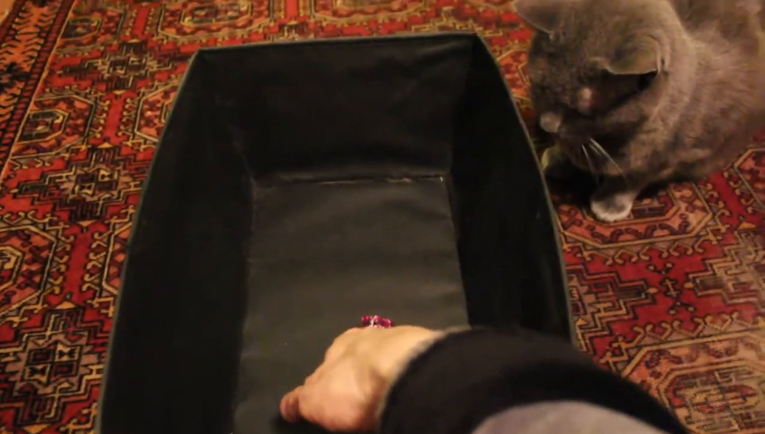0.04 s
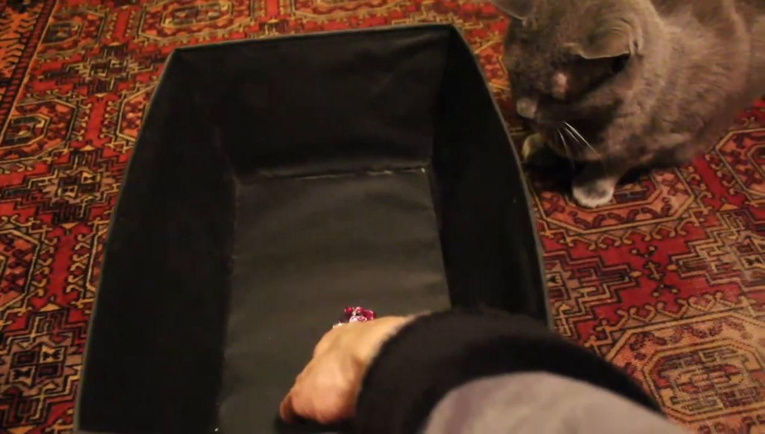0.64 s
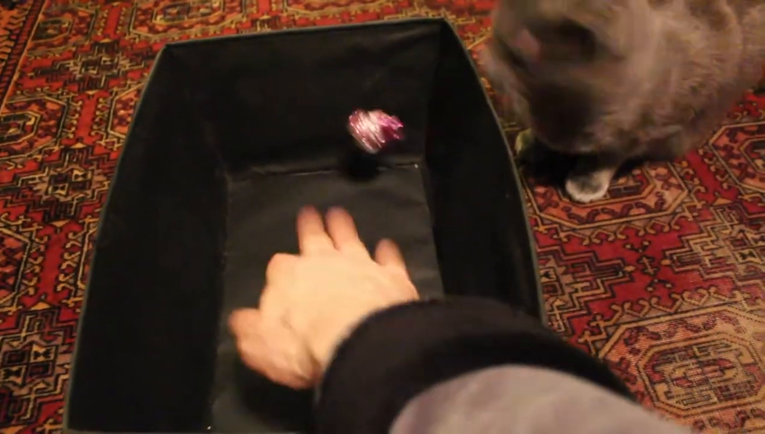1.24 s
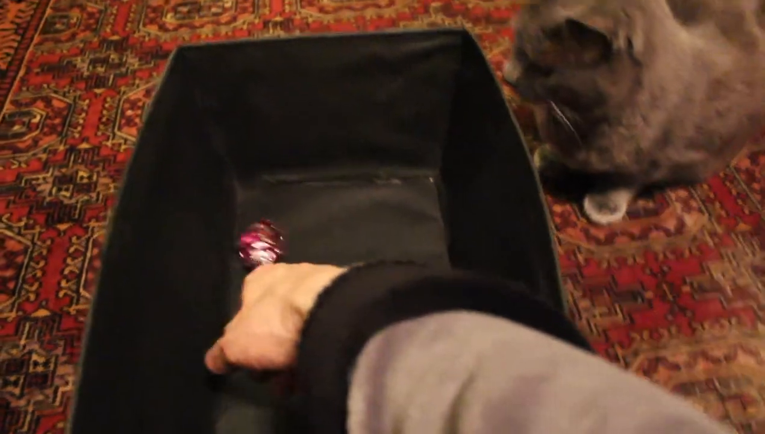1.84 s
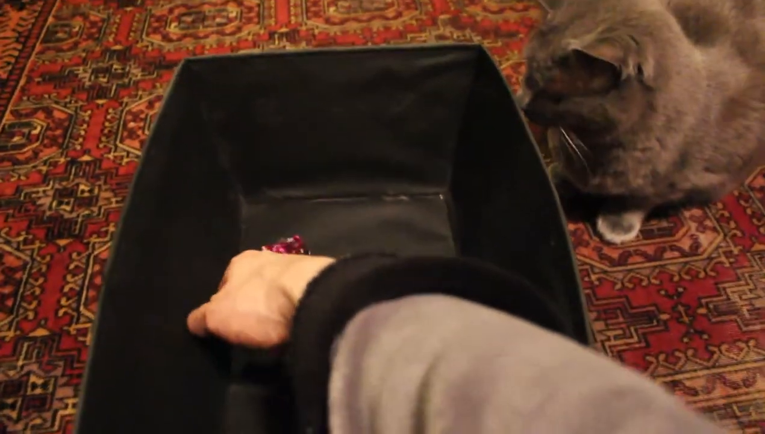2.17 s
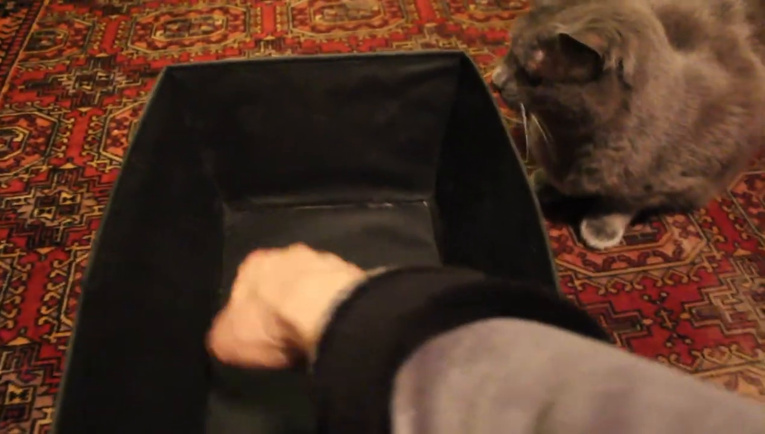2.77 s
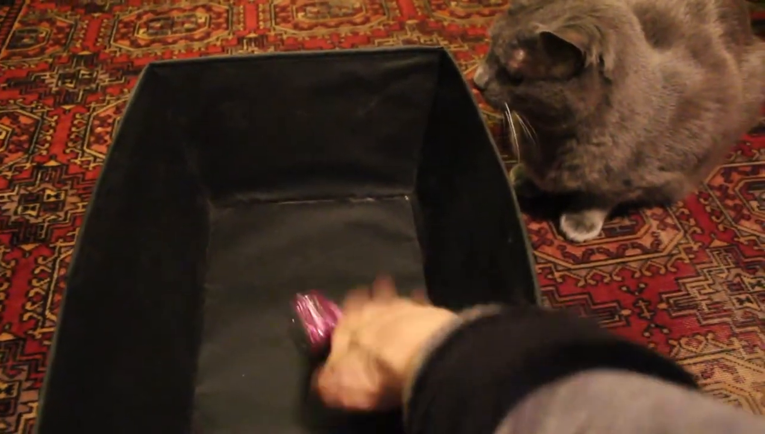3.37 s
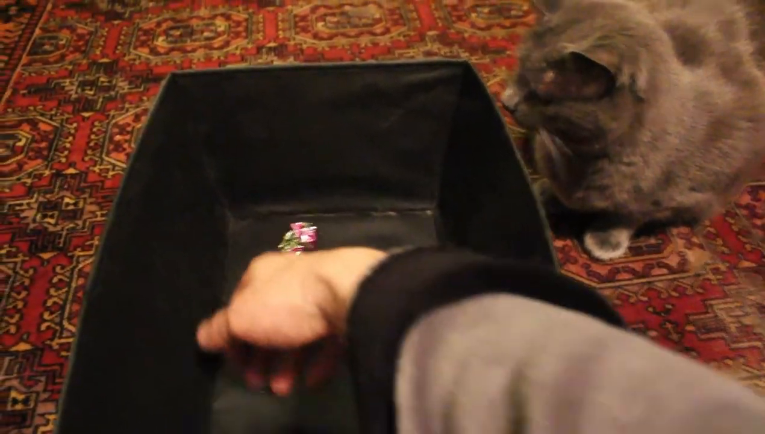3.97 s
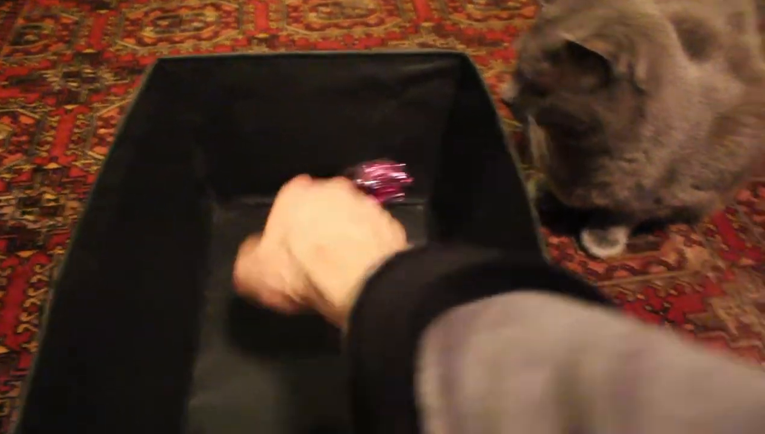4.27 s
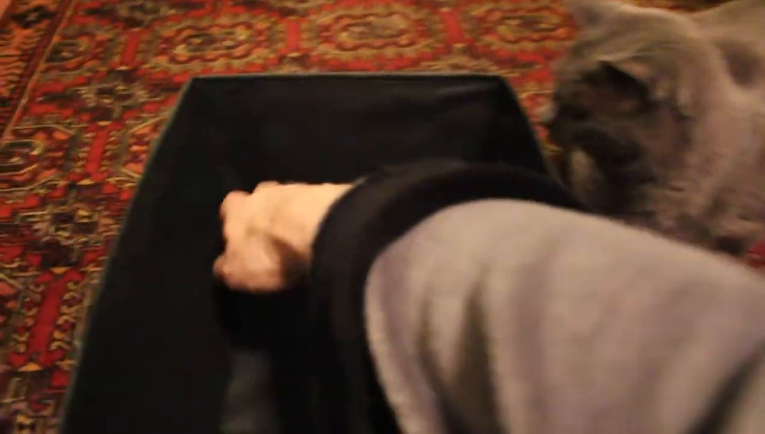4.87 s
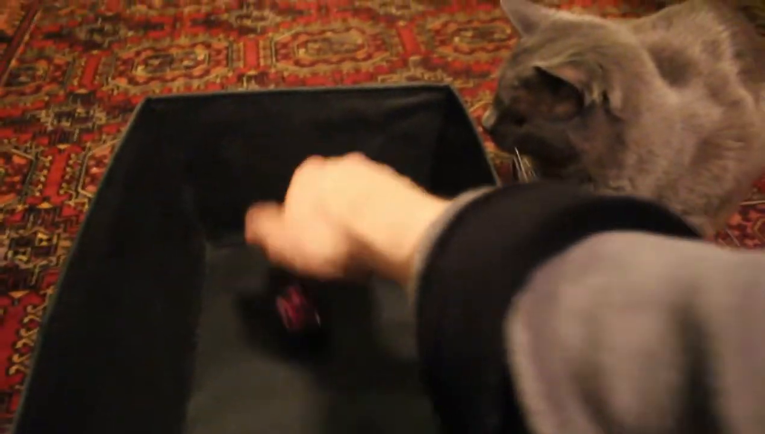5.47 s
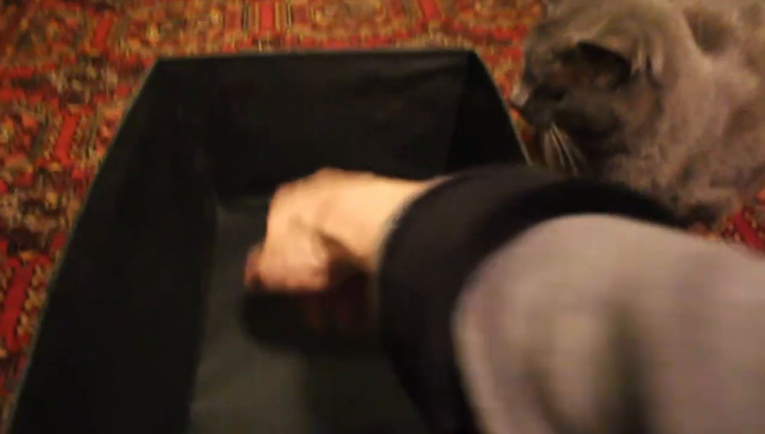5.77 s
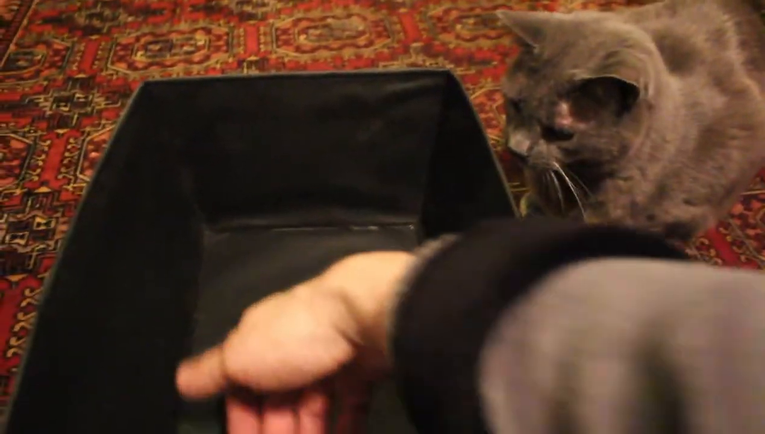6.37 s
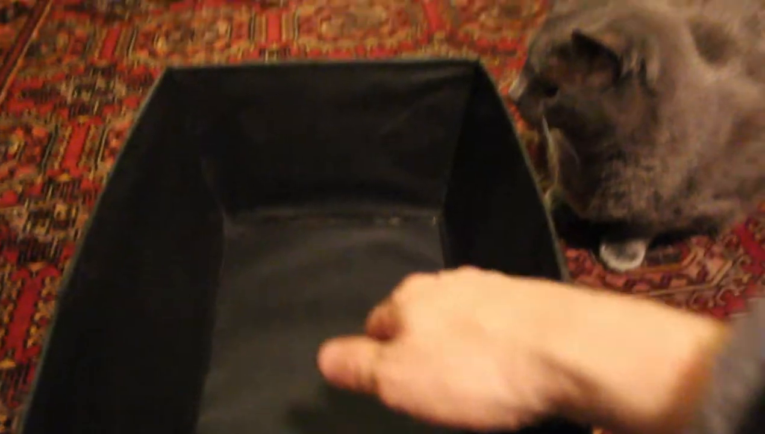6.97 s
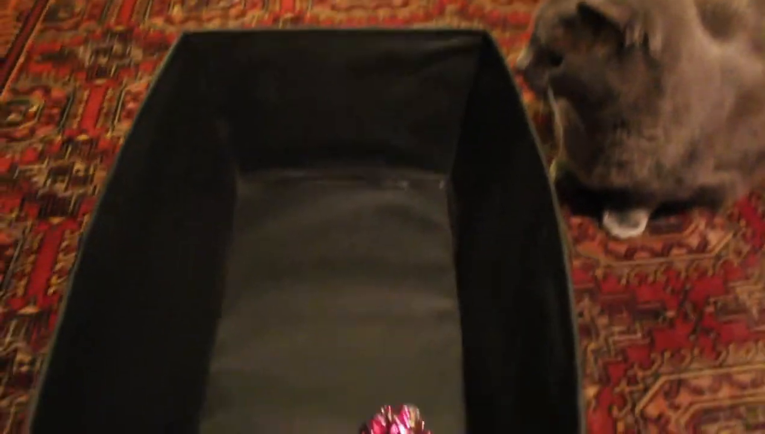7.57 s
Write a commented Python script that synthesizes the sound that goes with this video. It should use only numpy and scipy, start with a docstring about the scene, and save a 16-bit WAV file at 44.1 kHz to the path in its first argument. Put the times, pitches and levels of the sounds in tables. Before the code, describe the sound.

A low hum and soft noise fill a small room, with two faint handling rubs by the microphone. At about 1.1 seconds a crumpled foil ball is flicked inside a fabric box: a quick cluster of crisp crackling taps and light thumps, then bounces and small tumbling ticks. Around 2.5 seconds comes a sharp crunch with a stronger, dull wall thump. Softer crackles and a cloth scuff follow from 3.4 seconds. At 4.2 seconds a tight burst of clicks lands with a deep thump, and another sharp hit comes at 5.1. Lighter taps fall around 5.8, then a loud snap and thump at 6.5. Between hits the ball rolls with faint crinkling, and fingers occasionally tick or rub close to the microphone. Two soft taps come just before 7 seconds, and a sleeve rustles faintly at the end. Everything sounds close, with a short echo.

```python
"""In a small living room, a crumpled foil ball is flicked round a soft fabric box on the carpet.
It crackles, thumps the walls, bounces and rolls out. Each contact is a burst of tiny snaps of its
creases. The box's panels swing, the floor booms, and the ceiling and the room answer.
A hand ticks and rubs on the case of the camera it holds, over a low hum and room noise.
A sleeve rustles faintly at the end."""
import sys
import numpy as np
from scipy import signal
from scipy.fft import rfft, irfft, next_fast_len
from scipy.io import wavfile
from scipy.ndimage import uniform_filter1d, map_coordinates

SR = 44100
rng = np.random.default_rng(int(sys.argv[2]) if len(sys.argv) > 2 else 0)


def generate_wav(signal):
    """Clip the signal to [-1, 1] and save it as 16-bit WAV at the path in sys.argv[1]."""
    frames = np.transpose(np.atleast_2d(signal))
    scaled = np.clip(frames, -1, 1) * 32767
    pcm = np.round(scaled).astype(np.int16)
    wavfile.write(sys.argv[1], SR, pcm)


N = 340839

# The tone of the room noise. Each row: frequency in Hz, relative level in dB.
AIR_TONE = [(25, -16.5), (45, -23), (70, -1), (95, -19), (170, -10.5), (250, -9), (400, -6.5), (700, -13),
            (1000, -15.5), (1600, -17), (3000, -14.5), (4200, -22.5), (9000, -31), (16000, -42.5)]
# Narrow humps in the background noise. Each row: pitch in Hz, width in Hz, relative level in dB.
DRONE_MODES = [(119.3, 31, -12), (1164, 61, -5.5)]
# Fingers slip on the camera case. Each row: start in seconds, level in dB, length in seconds.
CASE_RUBS = [(.235, -48, .075), (.604, -46, 0.027), (6.655, -42, 0.044), (6.69, -37.5, 0.1)]
# The grip ticks on the case. Each row: start in seconds, relative level in dB.
CASE_TICKS = [(3.262, -33.5), (4.401, -23.5), (5.201, -22.5), (5.727, -18.5), (7.168, -29)]
# How the case rings. Each row: pitch in Hz, width in Hz, relative level in dB.
CASE_MODES = [(974, 47, -6), (1187, 106, 6.5), (2060, 150, -1.5), (3730, 130, -5.5)]
# The room's echo. Each row: frequency in Hz, seconds it takes to fade by 60 dB.
ROOM_DECAY = [(150, 0.23), (1000, 0.25), (3000, 0.28), (7000, 0.26), (15000, 0.12)]
# The ball meets finger, wall or floor.
# Each row: start in seconds, level in dB, length in seconds, brightness in dB per octave.
BALL_CONTACTS = [(1.125, -26.5, 0.011, 0), (1.169, -31, 0.0043, 1.5), (1.185, -30, 0.014, 1),
                 (1.2296, -19.5, 0.0058, 1), (1.447, -24, 0.005, 0.5), (1.589, -34, 0.0042, 1),
                 (2.524, -22, 0.016, 1.8), (2.567, -26.5, .011, .3), (2.78, -29, 0.01, .5),
                 (3.384, -31, 0.042, -.2), (3.437, -39.5, 0.05, 1.5), (3.533, -37.5, 0.013, 2.5),
                 (3.578, -33.5, 0.025, 1.2), (3.701, -29.5, 0.014, 3), (4.173, -23.5, 0.0052, 2.5),
                 (4.192, -22, 0.0085, 2.5), (4.21, -29, .014, -2), (4.238, -28, 0.028, 1.5),
                 (4.38, -34, 0.018, 0.5), (5.06, -32, .021, 0), (5.08, -19.5, 0.0068, 2.8),
                 (5.116, -36.5, 0.027, 1), (5.224, -39, 0.04, -0.1), (5.762, -28, 0.019, 0.7),
                 (5.803, -35, 0.027, 2), (5.845, -33.5, 0.0081, 2), (6.023, -31.5, 0.017, -0.5),
                 (6.48, -16.5, 0.0039, 0.9), (6.506, -28, .015, .4), (6.525, -20, 0.0054, 0),
                 (6.767, -33.5, 0.025, -1.2), (6.931, -36, 0.014, -1)]
# The tone of the foil's snaps. Each row: frequency in Hz, relative level in dB.
FOIL_TONE = [(100, -30), (300, -10.5), (570, -19), (850, -6), (1300, -8.5), (1900, -1.5), (2500, -3.5),
             (3400, -0.5), (4800, -3.5), (6800, -7), (9500, -11), (12600, -19.5), (16000, -29)]
# Blows that move the box's panels. Each row: start in seconds, swing in dB, pitch in Hz.
PANEL_THUMPS = [(1.172, -34, 330), (1.232, -30.5, 330), (1.893, -35.5, 262), (2.188, -35.5, 255),
                (2.573, -19, 225), (2.782, -38, 200), (3.382, -27, 274), (4.194, -16, 151),
                (4.209, -37, 220), (4.259, -34, 130), (5.068, -30.5, 162), (5.858, -32.5, 217),
                (6.529, -19, 280)]
# Scuffs on the fabric. Each row: start in seconds, level in dB, length in seconds.
FABRIC_SCUFFS = [(1.449, -38, .004), (1.589, -35, 0.005), (2.494, -48, 0.017), (3.379, -30.5, 0.035),
                 (4.135, -43.5, 0.038), (4.194, -26, 0.0067), (5.068, -46, 0.0087), (5.758, -40.5, 0.011),
                 (5.848, -37, 0.013), (6.527, -30.5, .007)]
# How the taut fabric rings. Each row: pitch in Hz, width in Hz, relative level in dB.
FABRIC_MODES = [(850, 360, 5.5), (1385, 380, -2), (2040, 320, -2)]
# Faint rustles: the ball rolls out or shifts in the hand, and a sleeve rustles at the end.
# Each row: start in seconds, level in dB, length in seconds.
FAINT_RUSTLES = [(1.65, -52, 0.22), (1.956, -51.5, 0.31), (2.938, -49.5, 0.36), (3.72, -52.5, 0.43),
                 (4.47, -49.5, .55), (5.36, -51, .43), (6.066, -52.5, 0.66), (6.96, -51, 0.25),
                 (7.613, -57, .76)]
# The ball tips from edge to edge.
# Each row: start in seconds, first level in dB, seconds between tumbles, number of tumbles.
BALL_TUMBLES = [(1.664, -42, .047, 3), (2.859, -38.5, 0.093, 2), (3.781, -39.5, .044, 3),
                (4.541, -38, .087, 3), (5.363, -41, .052, 4), (6.09, -41.5, 0.085, 4)]
# The microphones' balance. Each row: frequency in Hz, how much louder the left one is in dB.
LEFT_LEAN = [(100, 6.4), (1000, 5.3), (4000, 4.9), (9000, 2.5)]


def amp(db):
    """Turn decibels into a gain."""
    return 10 ** (np.asarray(db) / 20)


def unit(x):
    """Scale a sound to an average (rms) level of 1."""
    return x / np.sqrt(np.mean(x ** 2) + 1e-20)


def along(points, hz):
    """Read between (Hz, value) points on a log frequency axis."""
    f, v = np.transpose(points)
    return np.interp(np.log(hz + 1), np.log(f + 1), v)


def add(track, s, x):
    """Mix x into the track, starting at s seconds."""
    i = max(round(s * SR), 0)
    track[..., i:i + x.shape[-1]] += x[..., :N - i]


def filtered(x, response):
    """Give each frequency in x the gain that response sets for it."""
    size = next_fast_len(N + SR // 2)
    return irfft(rfft(x, size) * response(np.fft.rfftfreq(size, 1 / SR)), size)[..., :N]


def resonances(modes, f):
    """A filter that rings at each mode, a pitch the object favours."""
    return sum(amp(db) * 1j * f * width / (pitch ** 2 - f * f + 1j * f * width)
               for pitch, width, db in modes)


def causal(db, size):
    """A filter with these gains that never rings before it is struck (minimum phase)."""
    cepstrum = irfft(np.log(amp(db)), size)
    cepstrum[1:size // 2] *= 2
    cepstrum[size // 2 + 1:] = 0
    return np.exp(rfft(cepstrum))


def stereo_noise(apart=1.0):
    """Hiss that both sides share, plus some of each side's own."""
    return rng.standard_normal(N) + apart * rng.standard_normal((2, N))


def snaps(count, rate, spread_db):
    """Random clicks of uneven size, about rate a second and at least one."""
    chance, sign, strength = rng.random(count), rng.choice([-1, 1], count), rng.standard_normal(count)
    fires = chance <= max(rate / SR, chance.min())
    return fires * sign * amp(spread_db * np.clip(strength, -2, 2))


def stereo_snaps(count, rate, spread_db, apart=1.0):
    """Some snaps reach both microphones, others just one."""
    shared, left, right = (snaps(count, rate, spread_db) for _ in range(3))
    return shared + apart * np.array([left, right])


def body(modes, top_hz, size=4096):
    """How a small body rings, with little bass; a softer touch has a lower top_hz."""
    hz = np.fft.rfftfreq(size, 1 / SR)
    return resonances(modes, hz) * (1j * hz / (600 + 1j * hz) / (1 + 1j * hz / top_hz)) ** 2


def friction(strokes, modes, top_hz, swell, size=16384):
    """Uneven slips ring a body; swell is the share of a stroke spent rising and falling."""
    out, response = np.zeros((2, N)), body(modes, top_hz, size)
    for s, db, length in strokes:
        count = int(np.clip(length * SR, 64, size // 2))
        slips = stereo_snaps(count, rate=2200, spread_db=-2) * signal.windows.tukey(count, swell)
        ring = irfft(rfft(slips, size) * response)
        add(out, s, amp(db) * ring * np.sqrt(count / (np.sum(ring.mean(0) ** 2) + 1e-20)))
    return out


def background(hum_hz=121.3):
    """Steady room noise with a low mains hum and a faint ring of the case."""
    air = unit(filtered(stereo_noise(), lambda hz: amp(along(AIR_TONE, hz))))
    drone = unit(filtered(stereo_noise(apart=0.98), lambda hz: resonances(DRONE_MODES, hz)))
    hum = unit(np.sin(2 * np.pi * hum_hz * np.arange(N) / SR))
    return amp(-51) * air + amp(-55.5) * drone + amp(-60.5) * hum


def grip():
    """Soft rubs and sharp ticks ring the camera case right beside the microphones."""
    out = friction(CASE_RUBS, CASE_MODES, top_hz=3020, swell=0.39)
    tick = irfft(body(CASE_MODES, top_hz=6000))
    for s, db in CASE_TICKS:
        add(out, s, amp(db - 2) * tick / np.abs(tick).max())
    return filtered(out, lambda hz: 1 / (1 + (hz / 6000) ** 4))


def linger(power, fade_s, step_s):
    """Sound energy hangs on, dying by 60 dB in fade_s."""
    keep = 10 ** (-6 * step_s / fade_s)
    return signal.lfilter([0, 1 - keep], [1, -keep], power)


def room_echo(x, near_db, tail_db):
    """A quick scatter between the box's walls feeds the longer echo of the room."""
    frames = dict(fs=SR, nperseg=256, noverlap=192)
    hz, t, spectrum = signal.stft(x.mean(0), **frames)
    power = np.roll(np.abs(spectrum) ** 2, 2, axis=1)  # the walls answer a few milliseconds late
    power = np.abs(uniform_filter1d(power, size=3, axis=0))  # tones from all directions blend
    near = linger(power, fade_s=0.065, step_s=t[1])
    tail = np.array([linger(band, fade_s, t[1]) for band, fade_s in zip(near, along(ROOM_DECAY, hz))])
    noise = signal.stft(stereo_noise(), **frames)[2]
    level = np.sqrt((amp(near_db) ** 2 * near + amp(tail_db) ** 2 * tail) / np.mean(np.abs(noise) ** 2))
    return signal.istft(noise * level, **frames)[1][:, :N]


def crunch(out, s, db, length, tilt_db, ring_hz=None, brush_s=0.003, size=4096):
    """Add one contact to out: a light brush, then a dense burst of snapping creases."""
    lead, count = round(brush_s * SR), int(np.clip(length * SR, 32, size // 2))
    press = np.concatenate([np.zeros(lead), signal.windows.tukey(count, 0.5)])
    brush = amp(-19) * signal.windows.tukey(lead + count, 0.5)
    burst = stereo_snaps(lead + count, rate=8000, spread_db=5.5, apart=0.41) * np.maximum(press, brush)
    hz = np.fft.rfftfreq(size, 1 / SR)
    octaves = np.log2(np.clip(hz, 900, 10000) / 3100)
    # Hard blows ring the whole shell; light taps ring one facet, a small flat face of the foil.
    shell_db = 4 * np.clip((db + 25) / 10, 0, 1) * np.exp(-(octaves / 0.28) ** 2)
    facet_db = 8.5 * np.exp(-(np.log2((hz + 1) / ring_hz) / 0.094) ** 2) if ring_hz else 0
    tone_db = along(FOIL_TONE, hz) + tilt_db * octaves + shell_db + facet_db
    crackle = irfft(rfft(burst, size) * causal(tone_db, size))
    add(out, s - brush_s, amp(db) * crackle * np.sqrt(count / np.sum(crackle.mean(0) ** 2)))


def ball_hits():
    """The foil crunches at each flick, wall hit and bounce."""
    out = np.zeros((2, N))
    for s, db, length, tilt_db in BALL_CONTACTS:
        crunch(out, s, db, length, tilt_db)
    return out


def box_thumps(hard_blow_db=-18, ceiling_delay_s=0.0134):
    """A struck panel swings out and back and flutters; the floor booms and the ceiling echoes."""
    def shaking(modes):
        noise = rng.standard_normal(N)
        return unit(filtered(noise, lambda hz: resonances(modes, hz) / (1 + (hz / 600) ** 2)))
    out, t = np.zeros(N), np.arange(SR // 3) / SR
    panel, floor = shaking([(141, 48, 0), (298, 180, 0)]), shaking([(62, 25, 0)])
    attack = 1 - np.exp(-t / 0.00071)
    for s, db, hz in PANEL_THUMPS:
        now, cycles = slice(round(s * SR), round(s * SR) + len(t)), hz * t
        swing = -np.sin(2 * np.pi * cycles) * (2 * cycles * np.exp(1 - 2 * cycles)) ** 2
        flutter = amp(db - 19.5) * panel[now] * amp(-60 * t / 0.34)
        boom_db = -35.5 + 1.1 * (db - hard_blow_db)  # light blows boom much less
        boom = amp(boom_db) * floor[now] * amp(-60 * t / 0.16)
        add(out, s, amp(db) * swing + (flutter + boom) * attack)
    return filtered(out, lambda hz: 1 + amp(-10.5) * np.exp(-2j * np.pi * hz * ceiling_delay_s))


def fabric_scuffs():
    """Fingers and ball drag over the stiff fabric and make it ring."""
    return friction(FABRIC_SCUFFS, FABRIC_MODES, top_hz=4600, swell=0.12)


def faint_rustles(clumps_per_s=70):
    """Fine crinkling comes in clumps and fades away; ball and sleeve share the foil's tone."""
    level = np.zeros(N)
    for s, db, length in FAINT_RUSTLES:
        add(level, s, amp(db) * np.linspace(1, 0, round(length * SR)) ** 0.89)
    wander = map_coordinates(rng.standard_normal(N // 100), [np.arange(N) * clumps_per_s / SR])
    clumps = amp(5.9 * np.clip(wander, -2, 2))
    crinkles = stereo_snaps(N, rate=2300, spread_db=5.5)
    return level * unit(filtered(clumps * crinkles, lambda hz: amp(along(FOIL_TONE, hz))))


def ball_tumbles(loss_db=1.55, facet_gap_s=0.008):
    """The ball tips on at an even pace, ever softer; each time three facets click at their own pitches."""
    out = np.zeros((2, N))
    for s, db, step, tumbles in BALL_TUMBLES:
        for k in range(round(tumbles)):
            scatter = np.clip(rng.standard_normal((3, 4)), -2, 2)
            for facet, (late, loud, bright, high) in enumerate(scatter):
                start = s + k * step + (facet + 0.22 * late) * facet_gap_s
                click_db = db - k * loss_db + 2.5 * loud
                ring_hz = 4750 * 2 ** (0.46 * high)
                crunch(out, start, click_db, length=0.0032, tilt_db=1.2 * bright, ring_hz=ring_hz)
    return out


def scene():
    """Mix the ball, the rustles, the hand, their echo, the box and the background."""
    play = ball_hits() + ball_tumbles() + faint_rustles() + fabric_scuffs()
    hand = grip()
    echo = room_echo(play + amp(-5) * hand, near_db=-3.5, tail_db=-6)
    return play + hand + echo + box_thumps() + background()


def record(dry):
    """The left microphone is the stronger one, and the highest treble is cut off."""
    def balance(hz):
        ratio = amp(along(LEFT_LEAN, hz))
        return np.array([2 * ratio / (1 + ratio), 2 / (1 + ratio)])
    return filtered(filtered(dry, balance), lambda hz: hz < 16100)


dry = scene()
out = record(dry)
generate_wav(out)
```